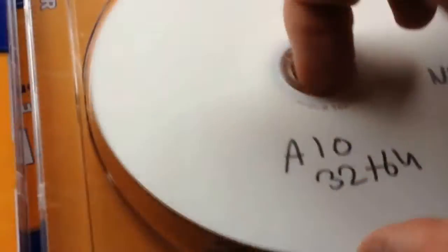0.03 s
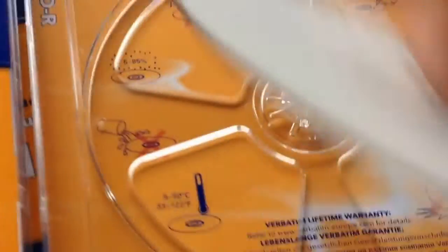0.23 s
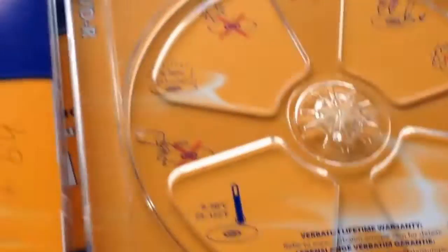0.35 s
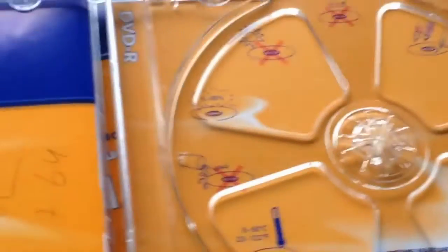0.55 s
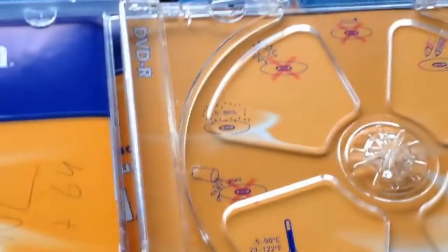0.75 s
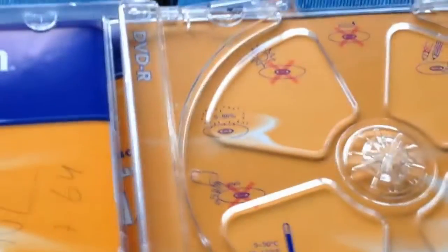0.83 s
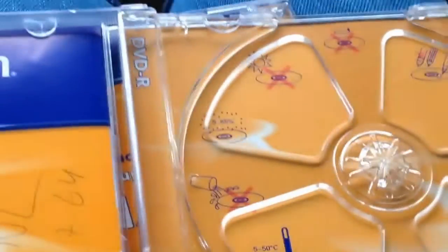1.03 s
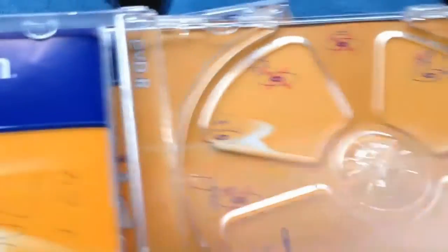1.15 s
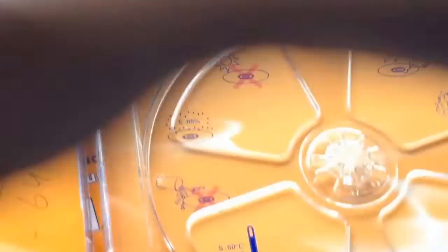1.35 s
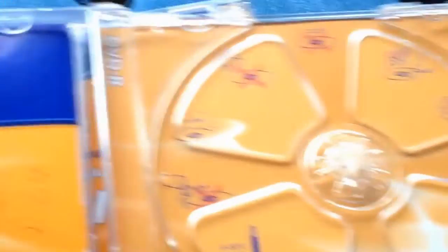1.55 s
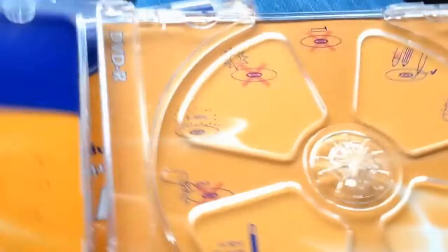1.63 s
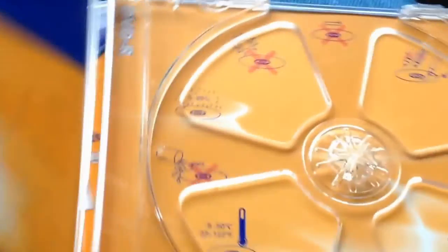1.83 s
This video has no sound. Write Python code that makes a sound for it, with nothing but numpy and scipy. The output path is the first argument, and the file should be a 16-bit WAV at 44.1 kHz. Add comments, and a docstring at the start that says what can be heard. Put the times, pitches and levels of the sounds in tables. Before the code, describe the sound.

A disc pops off the hub of a plastic case with a sharp snap, rattles briefly and slides away. Fingers then faintly tick, rub and bump on the case, close to the microphone in a small, quiet room.

```python
"""A disc snaps off the toothed hub of a clear plastic case, close by in a small, softly humming room.
First, skin rubs on the case and a finger ticks against it. Then the hub's teeth crack past the rim
of the disc's hole and ring. The freed disc clatters on the tray and slides away. After that, fingers
tick, rub and bump on the case, and the plastic gives a few thin creaks. Near the end the hand
rustles and softly bumps the case again."""
import sys
import numpy as np
from scipy import signal
from scipy.fft import rfft, irfft
from scipy.io import wavfile
from scipy.ndimage import uniform_filter1d

SR = 44100
rng = np.random.default_rng(int(sys.argv[2]) if len(sys.argv) > 2 else 0)


def transcribe(u):
    """Save the signal u as a 16-bit wav file named by the first command-line argument.

    u: samples, shape (n,) or (channels, n), limited to [-1, 1]; the rate is SR.
    q: integer samples, one column per channel.
    """
    v = np.clip(np.atleast_2d(u).T, -1, 1)
    q = np.round(v * 32767).astype(np.int16)
    wavfile.write(sys.argv[1], SR, q)


N = 83790
ATTACK_S = 0.00028  # how quickly a struck sound starts


def amp(db):
    """Turns decibels into a number to multiply a sound by."""
    return 10 ** (np.asarray(db) / 20)


def unit(x):
    """Scales a sound to an average (rms) size of 1."""
    return x / np.sqrt(np.mean(x ** 2) + 1e-20)


def look_up(points, hz):
    """Reads between a table's rows, on a scale of octaves."""
    pitches, values = np.transpose(points)
    return np.interp(np.log(hz + 1), np.log(pitches + 1), values)


def add(mix, start_s, sound):
    """Mixes a sound in at the given time."""
    part = mix[round(start_s * SR):][:len(sound)]
    part += sound[:len(part)]


def colour(noise, tone, tilt_db=0):
    """Shapes noise by a tone table; a tilt above 0 makes it brighter."""
    hz = np.fft.rfftfreq(len(noise), 1 / SR)
    tilt = tilt_db * np.log2(np.maximum(hz, 500) / 2500)
    return unit(irfft(rfft(noise) * amp(look_up(tone, hz) + tilt), len(noise)))


def even_out(noise):
    """Smooths a noise so that no pitch sticks out by chance."""
    spectrum = rfft(noise)
    nearby_power = uniform_filter1d(abs(spectrum) ** 2, size=70)
    return irfft(spectrum / np.sqrt(nearby_power + 1e-12), len(noise))


def burst(tone, fade_s, tilt_db=0):
    """A click: many close notes struck at once. A fade time is how long a 60 dB drop takes."""
    t = np.arange(SR // 4) / SR
    fade = (1 - np.exp(-t / ATTACK_S)) * 1000 ** (-t / fade_s)
    click = colour(even_out(rng.standard_normal(len(t)) * fade), tone, tilt_db)
    soft_end = np.minimum(2 - 2 * t / t[-1], 1) ** 2
    return unit(click * soft_end) * np.sqrt(np.mean(fade ** 2))


def ring(notes):
    """A struck part rings with pure notes, each fading at its own speed."""
    t = np.arange(SR // 4) / SR
    sound = sum(amp(db - 60 * t / fade_s) * np.sin(2 * np.pi * hz * t) for hz, db, fade_s in notes)
    return sound * (1 - np.exp(-t / ATTACK_S))


def touches(events, tone):
    """One short burst for each row, all with the same tone."""
    out = np.zeros(N)
    for start_s, db, fade_s in events:
        add(out, start_s, amp(db) * burst(tone, fade_s))
    return out


def friction(levels, tone, slips_per_s=21000, spread_db=1):
    """Rubbing surfaces catch and let go in many tiny, uneven slips."""
    sizes = amp(spread_db * np.minimum(rng.exponential(1, N), 4))
    slips = sizes * rng.standard_normal(N) * (rng.random(N) < slips_per_s / SR)
    loudness = amp(np.interp(np.arange(N) / SR, *np.transpose(levels)))
    return loudness * colour(slips, tone)


# the room's steady noise: (pitch [Hz], relative level [dB])
AIR_TONE = [(25, -22.5), (65, -24.5), (110, -9), (200, -2.5), (300, -2), (400, -7.5), (800, -9.5),
            (2000, -13.5), (3500, -21), (8000, -24.5), (15000, -28)]
# faint low hums: (pitch [Hz], width [Hz], level [dB])
ROOM_HUMS = [(184.5, 13, -77.5), (221.8, 18, -76.5), (292, 18, -76.5)]
def room_tone(air_db=-68):
    """Steady background noise with a few low, wavering hums."""
    hz = np.fft.rfftfreq(N, 1 / SR)
    out = amp(air_db) * colour(rng.standard_normal(N), AIR_TONE)
    for centre, width, db in ROOM_HUMS:
        narrow_band = 1 / (1 + (2 * (hz - centre) / width) ** 2)
        out += amp(db) * unit(irfft(rfft(rng.standard_normal(N)) * narrow_band, N))
    return out


# how loud the rubbing is: (time [s], level [dB])
RUB_LEVELS = [(0, -61.5), (0.06, -74.5), (0.3, -77), (0.53, -71), (0.6, -61), (0.65, -64.5), (0.72, -71.5),
              (0.77, -59), (0.82, -61), (0.86, -66.5), (0.91, -76), (1.0, -67.5), (1.18, -83),
              (1.25, -66.5), (1.31, -76), (1.42, -66.5), (1.7, -69), (1.9, -72)]
# skin on plastic: (pitch [Hz], relative level [dB])
RUB_TONE = [(100, -23.5), (400, -5), (1000, -2.5), (2000, 2), (2800, -3.5), (4000, -13.5), (7000, -13.5),
            (15000, -20.5)]
def skin_rub():
    """Skin drags over the case in tiny slips."""
    return friction(RUB_LEVELS, RUB_TONE)


# the case's own notes: (pitch [Hz], relative level [dB], fade time [s])
CASE_NOTES = [(574, -12.5, 0.1), (818, -15, .14), (917, -13.5, .13), (1270, -10.5, .15),
              (1398, -10.5, 0.12), (1470, -6.5, 0.066), (1655, -9, 0.089), (1912, -2.5, 0.12),
              (2142, -3.5, 0.066), (2160, -6.5, .11), (2307, -11.5, 0.15), (3190, -11, 0.088),
              (3440, -10, .1), (3690, -11, .1)]
def case_ring():
    """The case rings with the same notes whether a finger or the disc hits it."""
    return ring(CASE_NOTES)


# finger taps: (time [s], level [dB], tilt [dB per octave], fade time [s], spot's pitch [Hz])
FINGER_TAPS = [(0.1941, -54, -2.5, 0.051, 1810), (0.607, -50.5, -0.5, 0.029, 1500),
               (0.6293, -68.5, 1.5, .015, 2080), (0.658, -46, -3, 0.029, 2542),
               (0.6599, -49.5, 2, 0.019, 926), (0.7383, -53, -2, 0.036, 7840),
               (0.7417, -45.5, 0, 0.044, 2580), (0.7488, -44.5, 0.5, 0.022, 1790),
               (0.7522, -50.5, -3, 0.025, 1880), (0.761, -49, -3.5, 0.099, 1790),
               (0.767, -48.5, -1.5, 0.071, 2865), (0.7904, -46.5, -3.5, 0.069, 1340),
               (0.8302, -46, 1.5, 0.023, 1800), (0.8381, -54, 1.5, 0.061, 1906),
               (0.852, -44.5, -1.5, 0.037, 1592), (0.864, -52, 1, 0.066, 1850),
               (0.8679, -50, 3, 0.039, 3170), (1.0784, -56.5, -3, 0.041, 1316),
               (1.341, -58, 0.5, 0.037, 1473), (1.649, -62.5, 1.5, 0.034, 1870)]
# a fingertip's click: (pitch [Hz], relative level [dB])
TAP_TONE = [(40, -45), (100, -31.5), (250, -12.5), (600, -17), (900, -5), (1100, -8), (1500, -0.5),
            (2700, -2), (4200, -10.5), (7500, -15), (11000, -23.5), (15000, -28)]
def finger_ticks():
    """Fingers and nails click on the case. It rings faintly, most at the note of the spot touched."""
    out = np.zeros(N)
    case = amp(-19) * case_ring()
    for start_s, db, tilt_db, fade_s, hz in FINGER_TAPS:
        spot = ring([(hz, -1, 0.045)])
        add(out, start_s, amp(db) * (burst(TAP_TONE, fade_s, tilt_db) + case + spot))
    return out


# the hub lets go: (time [s], level [dB], fade time [s])
HUB_SNAPS = [(0.2082, -15, .035), (0.209, -11.5, 0.01)]
# the crack: (pitch [Hz], relative level [dB])
CRACK_TONE = [(30, -42), (100, -33.5), (220, -14.5), (500, -13.5), (850, -10.5), (1060, -13.5),
              (1350, -3.5), (2600, 3), (4800, -6.5), (6400, 0), (8500, -10.5), (15000, -12.5)]
# notes of the teeth and their base: (pitch [Hz], relative level [dB], fade time [s])
HUB_NOTES = [(801, -20.5, .09), (891, -18, 0.25), (1222, -19, .07), (1361, -15.5, 0.056),
             (1628, -15.5, 0.13), (2005, -11.5, 0.048), (2420, 0.5, 0.031), (2845, 1, .045),
             (3720, -18, 0.085), (4500, -12, .035), (6320, -8, 0.012), (6440, -7.5, .03), (7660, -18, .03)]
def hub_snap(ring_db=3):
    """The teeth crack past the rim of the hole; the first snap sets them ringing."""
    out = touches(HUB_SNAPS, CRACK_TONE)
    start_s, db, _ = HUB_SNAPS[0]
    add(out, start_s, amp(db + ring_db) * ring(HUB_NOTES))
    return out


# the disc hits the tray: (time [s], level [dB], tilt [dB per octave], fade time [s])
DISC_KNOCKS = [(0.2111, -19.5, 2.5, 0.036), (0.2153, -25, 0.5, 0.035), (0.2238, -22.5, 4, 0.025),
               (0.2246, -20, -1.5, 0.035), (0.2287, -27, 1.5, 0.11), (0.231, -27.5, -1, .03),
               (0.2347, -17, -2, 0.027), (0.2344, -17, 3, 0.017), (0.2381, -18, -1, 0.022)]
# a knock on the case: (pitch [Hz], relative level [dB])
KNOCK_TONE = [(30, -51.5), (80, -44), (135, -18.5), (230, -7.5), (450, -16), (880, -5), (1080, -12.5),
              (1500, 1), (2100, 4), (2800, -4.5), (3600, -2), (4600, -13), (6500, -11), (10000, -14.5),
              (15000, -23.5)]
def disc_clatter():
    """The freed disc rattles on the tray; each knock clicks and rings the case."""
    out = np.zeros(N)
    case = amp(-16.5) * case_ring()
    for start_s, db, tilt_db, fade_s in DISC_KNOCKS:
        add(out, start_s, amp(db) * (burst(KNOCK_TONE, fade_s, tilt_db) + case))
    return out


# how loud the slide is: (time [s], level [dB])
SLIDE_LEVELS = [(0.37, -98), (0.41, -66), (0.44, -54.5), (0.47, -53), (0.495, -68.5), (0.52, -95)]
# disc on plastic: (pitch [Hz], relative level [dB])
SLIDE_TONE = [(100, -25), (500, -17.5), (950, -1), (1130, -9), (1400, 0.5), (1900, -4), (2330, 6.5),
              (2750, -1.5), (3300, -4), (4500, -13.5), (7000, -12), (12000, -20), (15000, -19.5)]
def disc_slide():
    """The disc scrapes lightly as it slides off the tray."""
    return friction(SLIDE_LEVELS, SLIDE_TONE)


# the plastic creaks: (time [s], level [dB], fade time [s])
CASE_CREAKS = [(0.5845, -55.5, 0.014), (0.894, -49, 0.023), (1.015, -58, 0.025)]
# a thin creak: (pitch [Hz], relative level [dB])
CREAK_TONE = [(300, -31), (2400, 5), (4000, 0.5), (7000, 1), (10300, 8.5), (12500, -1), (15000, -8)]
def plastic_creaks():
    """The plastic gives very short, high creaks."""
    return touches(CASE_CREAKS, CREAK_TONE)


# the hand meets the case: (time [s], level [dB], fade time [s])
HAND_BUMPS = [(0.745, -58.5, 0.078), (0.768, -56.5, 0.049), (1.742, -55, 0.051), (1.761, -56, 0.075),
              (1.798, -58, 0.069), (1.844, -55, .06), (1.872, -60, .07)]
# a dull bump: (pitch [Hz], relative level [dB])
BUMP_TONE = [(30, -50), (70, -44), (130, -20), (220, 1.5), (450, 4.5), (700, -8.5), (2000, -32)]
def hand_bumps():
    """The hand bumps the case with soft, low thuds."""
    return touches(HAND_BUMPS, BUMP_TONE)


# how loud the rustle is: (time [s], level [dB])
RUSTLE_LEVELS = [(1.3, -90), (1.43, -67.5), (1.52, -82.5), (1.66, -67.5), (1.8, -69.5), (1.9, -79)]
# a high rustle: (pitch [Hz], relative level [dB])
RUSTLE_TONE = [(300, -7), (3000, -7), (7000, -1), (11000, -5), (15000, -0.5)]
def hand_rustle():
    """The moving hand makes a soft, high rustle."""
    return friction(RUSTLE_LEVELS, RUSTLE_TONE)


# how long the room's echo lasts: (pitch [Hz], fade time [s])
ECHO_FADES = [(150, .2), (400, .3), (1200, .26), (2100, 0.23), (3200, .24), (7000, .26), (15000, .21)]
def room_echo(sound, delay_s=0.0044, rise_s=0.008):
    """The room answers with a short, blurred echo, each pitch fading at its own speed."""
    hz, t, noise = signal.stft(rng.standard_normal(SR // 2), SR, nperseg=512)
    fade = amp(-60 * t / look_up(ECHO_FADES, hz)[:, None])
    tail = signal.istft(noise / abs(noise) * fade, SR, nperseg=512)[1]
    tail *= np.clip((np.arange(len(tail)) / SR - delay_s) / rise_s, 0, 1)
    return signal.fftconvolve(sound, tail / np.linalg.norm(tail))[:N]


def scene(echo_db=-14.5):
    """Adds the hand, the case, the disc and the room into one channel."""
    close = skin_rub() + finger_ticks() + hub_snap() + disc_clatter() + disc_slide()
    close += plastic_creaks() + hand_bumps() + hand_rustle()
    return (room_tone() + close + amp(echo_db) * room_echo(close))[None]


def record(dry):
    """Cuts away the very highest treble."""
    treble_cut = signal.firwin(401, cutoff=15450, window=("kaiser", 9), fs=SR)
    return signal.oaconvolve(dry, treble_cut[None], "same")


dry = scene()
out = record(dry)
transcribe(out)
```